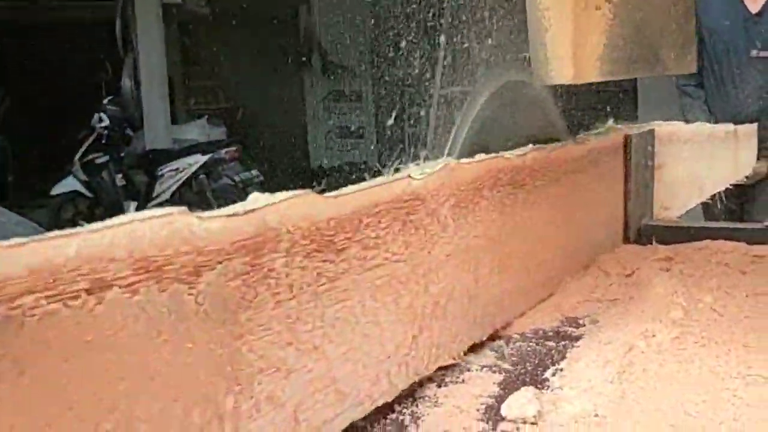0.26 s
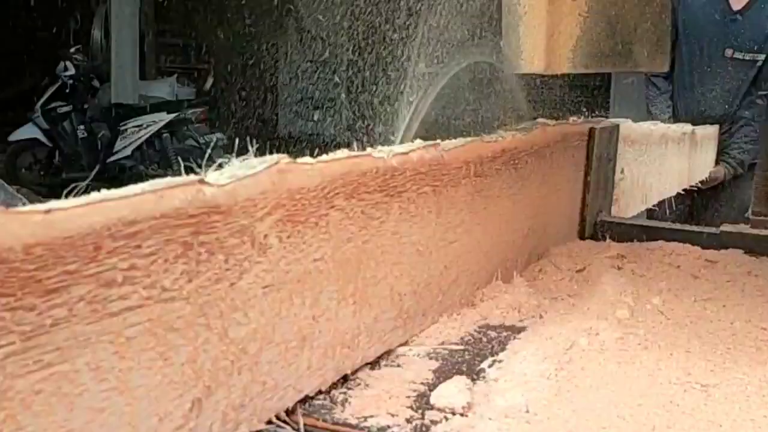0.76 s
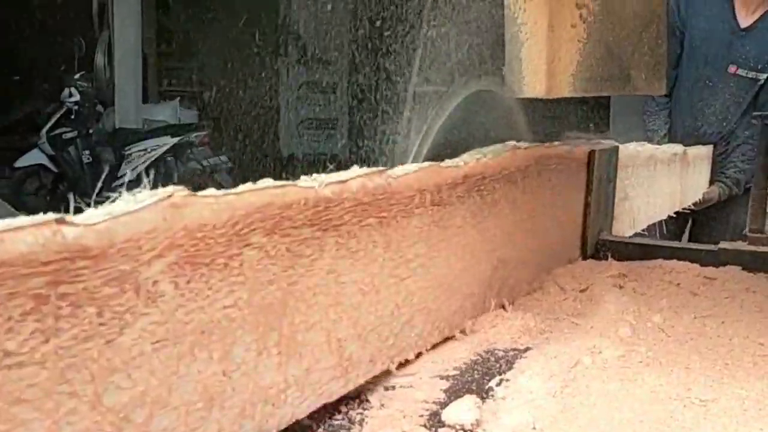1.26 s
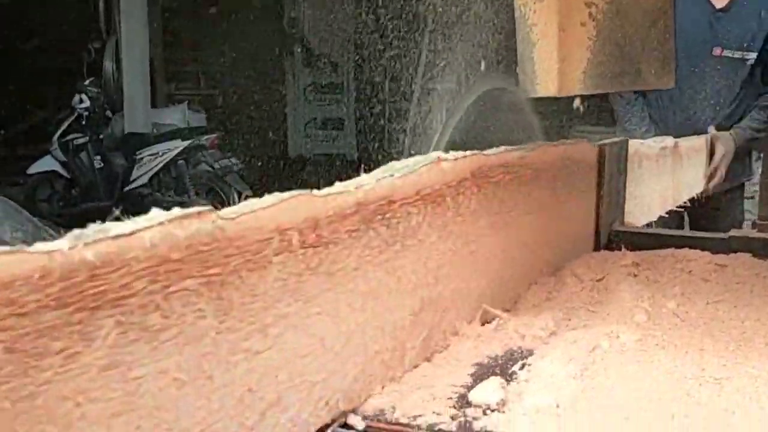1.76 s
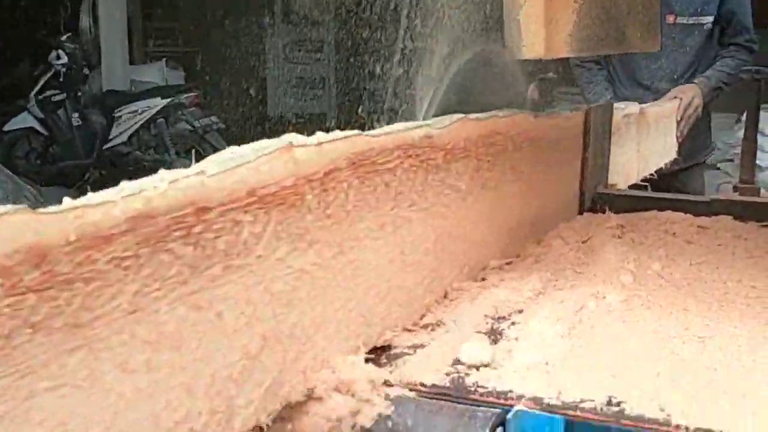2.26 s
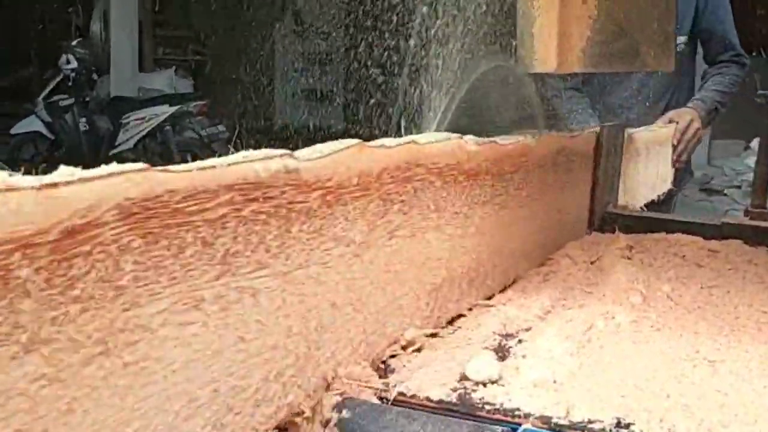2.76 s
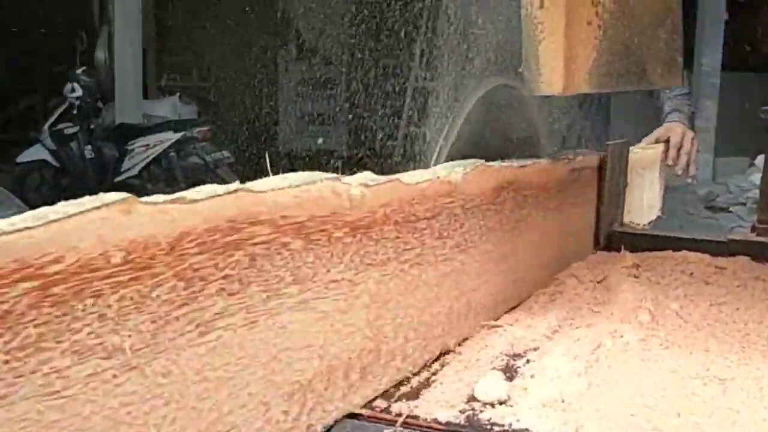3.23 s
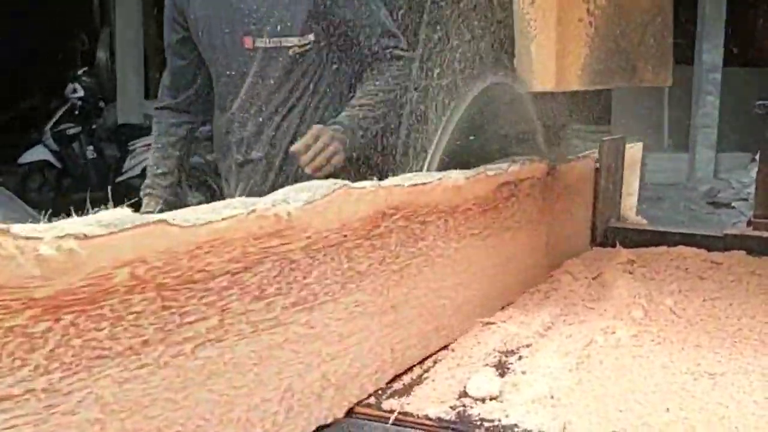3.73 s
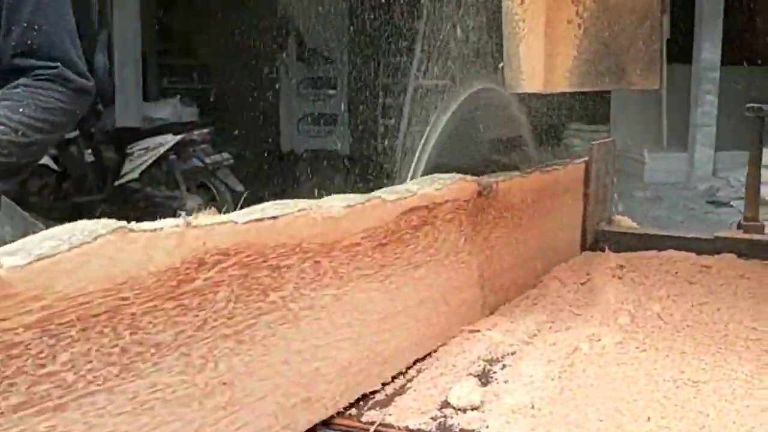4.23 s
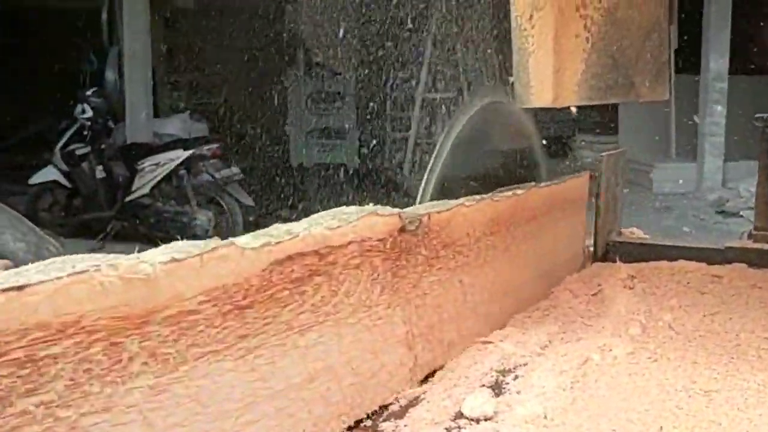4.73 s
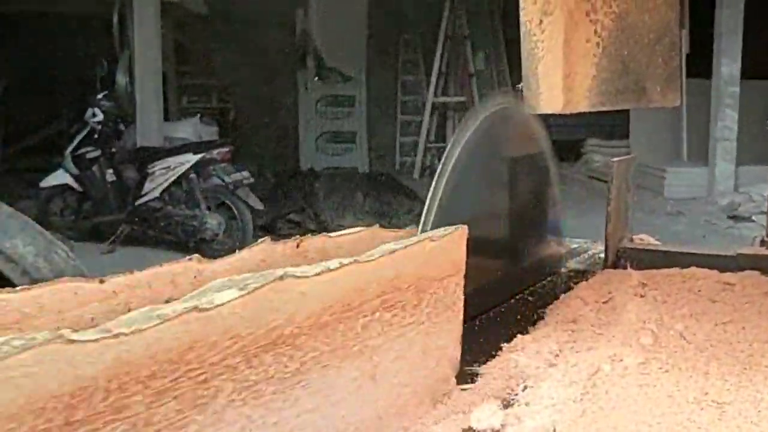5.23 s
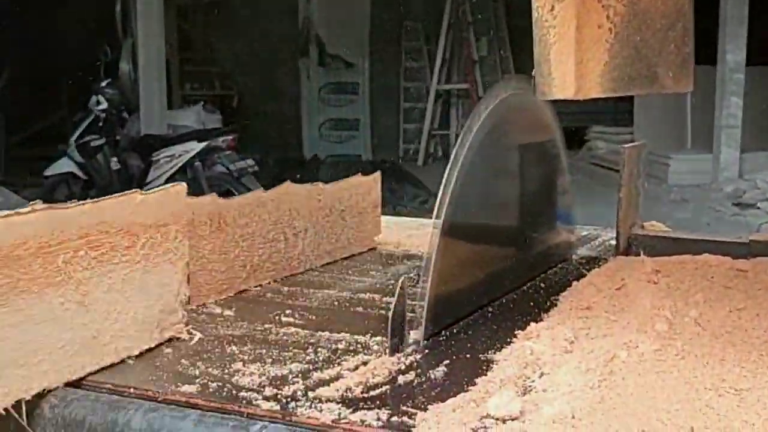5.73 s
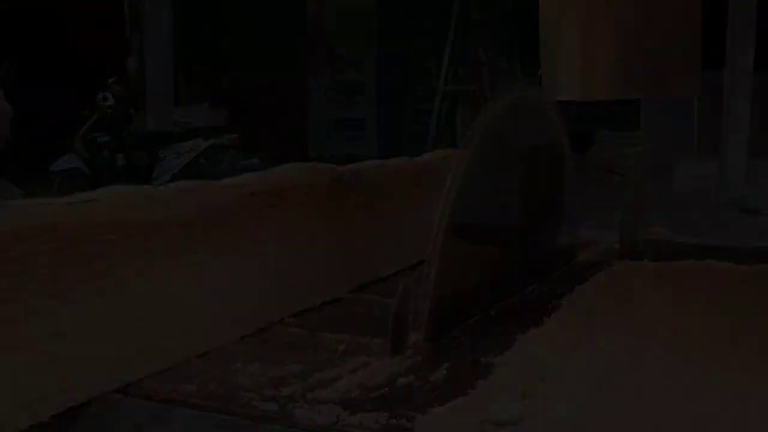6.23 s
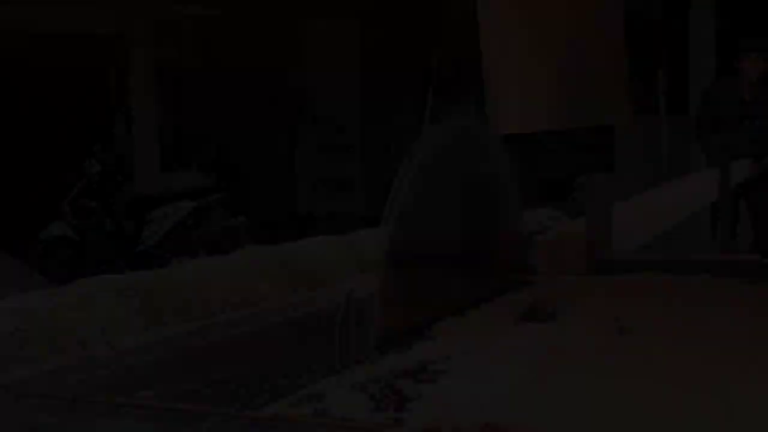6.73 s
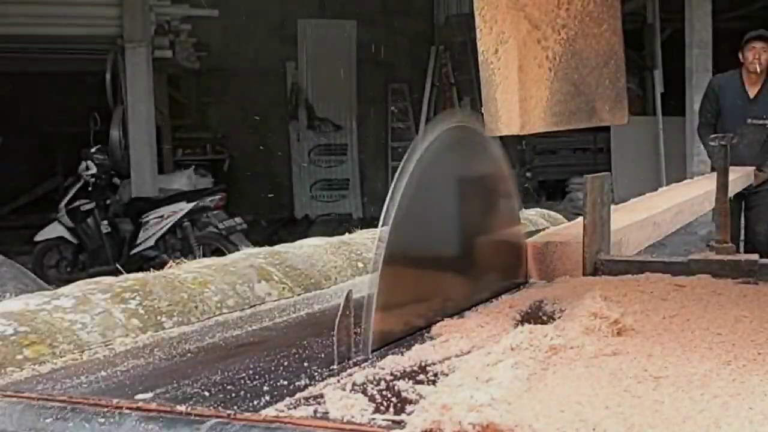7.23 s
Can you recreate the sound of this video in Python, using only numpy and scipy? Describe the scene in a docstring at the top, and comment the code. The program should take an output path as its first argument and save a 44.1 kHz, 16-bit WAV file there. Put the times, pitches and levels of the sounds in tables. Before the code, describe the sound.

From 0 to about 4.5 seconds, a large circular saw rips a log very close by in an open-air mill. A dense, bright, gritty rasp wavers slightly with the grain, with hissing chip spray, short fluttering blade pings and singing overtones. Underneath, a one-cylinder diesel pulses about twenty-one times a second, knocking under load while the rig judders dully. Around 4.5 the teeth break out: the rasp collapses amid hard knocks, and exhaust thumps bark out over rattling belts and metal, picking up slightly in speed. From 4.9 to 6.5, the plank brushes the free blade in soft, shimmering metallic swells. The sound slides down from about 5.8 to a snap of silence near 6.7, then rises again until the end at 7.5, with engine chug, clatter and a blade ring now leaning left, a light rasp growing as the next log nears the teeth.

```python
"""Open-air sawmill

A big circular saw, driven by a one-cylinder diesel, rips a log. Bursts of filtered noise make the rasp of the
teeth and the chip spray; narrow tones make the blade sing, and under load the exhaust comes in dull thuds. The
cut ends, the engine thumps on in filtered puffs and ringing knocks, and the blade rings as the plank slides
past it. The sound fades out, and fades in again as the next log nears the teeth."""
import sys
import numpy as np
from scipy import signal
from scipy.fft import rfft, irfft
from scipy.io import wavfile
from scipy.ndimage import uniform_filter1d

SR = 44100
rng = np.random.default_rng(int(sys.argv[2]) if len(sys.argv) > 2 else 0)


def dump(signal):
    """Clip the signal to [-1, 1] and save it as 16-bit WAV at the path in sys.argv[1]."""
    limited = np.clip(np.atleast_2d(signal).T, -1, 1)
    pcm = np.round(limited * 32767).astype(np.int16)
    wavfile.write(sys.argv[1], SR, pcm)


N = 329868
TIME = np.arange(N) / SR

# The engine labours in the cut and picks up when the blade comes free.
# Each row: time in seconds, engine firings per second.
ENGINE_SPEED = [(0, 20.99), (.4, 20.38), (.8, 21.13), (1.2, 20.59), (3.6, 20.46), (3.8, 20.98),
                (4.4, 21.27), (4.8, 22.17), (5, 21.4), (5.4, 21.94), (5.8, 21.44), (6.2, 21.97),
                (7.48, 21.92)]
# The log runs out, and later the next one meets the teeth.
# Each row: time in seconds, bite of the teeth in the wood from 0 to 1.
BITE = [(0, 0.98), (4.48, 0.85), (4.555, 0.16), (4.72, 0.05), (6.7, 0.15), (7.2, 0.1), (7.48, 0.4)]
# The grain along the log. Each row: time in seconds, rasp level at full bite in dB, rasp centre in Hz.
GRAIN = [(0, -25.3, 4620), (.3, -23.5, 4340), (.55, -24, 4200), (.85, -24, 4090), (1, -23.5, 4120),
         (1.5, -23.5, 4300), (2.1, -24.5, 4550), (2.7, -24, 4650), (3.7, -23.5, 4490), (4, -24.5, 4380),
         (4.3, -23.2, 4520), (4.48, -22, 4370)]

# Broad tone of each layer. Each row: frequency in Hz, relative density in dB per Hz.
RASP_TONE = [(300, -34), (480, -21.5), (620, -9), (1280, -4), (1550, -11.5), (2200, -11), (3100, -10),
             (3850, 0.7), (4350, 0.6), (4950, 2.7), (5650, -6), (6300, -12.5), (7500, -17), (10000, -27.5),
             (16000, -51.5)]
SPRAY_TONE = [(3000, -19.5), (6000, 6), (8500, -1), (10300, 2), (12500, 0), (15000, -8)]
EXHAUST_TONE = [(15, -11), (40, -3), (100, -2), (180, -1), (310, 0), (370, -5.5), (480, -8.5), (570, -9),
                (680, -20.5), (1100, -55), (4000, -74)]
LOADED_PUFF_TONE = [(15, -18.5), (40, -3), (80, 3), (180, 0.5), (290, -1.5), (350, -9), (450, -23.5),
                    (700, -17.5), (2000, -78)]
CLATTER_TONE = [(100, -3), (400, -5), (780, -4.5), (1020, 1.5), (1500, -0.5), (2200, 0), (2750, -3.5),
                (3200, -3), (4400, -12), (5200, -8), (5600, -13.5), (7500, -31), (10500, -27.5),
                (15000, -44)]
KNOCK_TONE = [(200, -21.5), (500, -28.5), (640, -11.5), (740, -17), (860, -2.5), (1000, -0.5), (1280, -1),
              (1500, -27.5), (2000, -6), (3000, -26), (8000, -47)]
RING_TONE = [(2500, -14.5), (3200, -6), (3600, 3.5), (4050, 2), (4450, 1.5), (4800, -3.5), (5100, -24),
             (5550, -16), (6500, -18.5), (10000, -50)]
RUMBLE_TONE = [(15, -1.5), (30, -7.5), (60, 2), (110, 0.5), (180, 1), (260, -6), (380, -13), (560, -19.5),
               (750, -36), (2000, -73.5)]

# Modes of the engine casting, then of a loose sheet-metal cover.
# Each row: frequency in Hz, 60 dB decay time in seconds, relative level in dB.
CRANKCASE_MODES = [(650, 0.043, -8), (797, 0.07, -1.5), (938, 0.051, 1.5), (1169, 0.058, -5.5),
                   (1307, 0.067, -7)]
COVER_MODES = [(977, 0.069, -1.5), (1061, 0.072, -3), (1790, 0.08, -5), (2273, .08, -9)]

# Resonances of the hum under the loaded thuds, the guard, the exhaust pipe, and the blade in the wood and free.
# # Each row: frequency in Hz, width in Hz, lift in dB.
LOADED_HUM = [(53.3, 9.9, 6), (169, 59, 2), (252.7, 18.5, 6.5), (312, 7.8, 4.5)]
GUARD = [(2260, 20, 2), (2734, 74, 3.7), (5450, 200, 3)]
PIPE = [(113, 19, 5), (163.6, 28, 7), (210.4, 15, 4), (273, 21, 5.5), (319.7, 15.5, 4.5), (503, 12, 2.5),
        (581, 24, 9)]
BLADE_IN_WOOD = [(1917, 140, 11.5), (2690, 150, 4.7), (3110, 930, 9.9), (5550, 240, 4.8)]
BLADE_FREE = [(3750, 60, 3.3), (4053, 70, 5.6), (4640, 120, 2.4)]

# The hardest single knocks. Each row: time in seconds, dB above an ordinary knock.
HARD_KNOCKS = [(.038, 3), (.241, 1), (.283, 3), (.388, 3.5), (1.055, 4.5), (1.983, 2.5), (2.174, 5.5),
               (2.813, 2.5), (3.2, 3), (3.349, 3), (3.83, 5.5), (4.072, 4), (4.31, 3.5), (4.351, 4),
               (4.397, 5.5), (4.448, 5), (4.548, 8), (4.641, 8.5), (4.685, 7), (4.96, 1.5), (5.05, 4),
               (5.097, 4), (5.282, 4.5), (5.781, 5), (5.831, 3)]
# The hardest exhaust thumps once the blade is free. Each row: time in seconds, dB above an ordinary puff.
HARD_THUMPS = [(4.753, 1), (4.798, 2), (4.84, 1.5), (4.894, 2.5), (4.94, 3.5), (4.991, 3), (5.035, 2.5),
               (5.122, 4), (5.173, 2.5), (5.211, 3.5), (5.311, 2), (5.486, 2.5), (5.539, 3), (5.584, 2.5),
               (5.626, 3), (5.769, 1.5), (5.863, 2), (5.955, 1), (6, 2)]
# The blade's clearest pings, in the cut and as it breaks out.
# Each row: time in seconds, mean pitch in Hz, peak in dB ahead of the stereo stage.
CHIRPS = [(.252, 2640, -28), (.696, 2540, -30), (1.258, 2550, -30), (1.462, 2560, -34), (1.703, 2570, -31),
          (1.804, 2630, -31), (1.849, 2600, -28.5), (2.196, 2580, -28), (2.296, 2566, -34),
          (2.528, 2560, -29), (2.634, 2570, -28), (3.412, 2560, -27.5), (3.508, 2570, -28.5),
          (3.603, 2540, -31), (4.413, 2610, -31), (4.46, 2680, -29), (4.555, 2560, -33), (4.61, 2460, -32),
          (4.652, 2495, -31), (4.745, 2300, -30)]
# The plank brushes the free blade. Each row: closest touch in seconds, length in seconds, ring in dB.
BRUSHES = [(4.92, 0.46, -35), (5.273, 0.27, -27.5), (5.643, 0.26, -26), (5.88, 0.15, -27),
           (6.148, 0.27, -26.5), (6.515, 0.44, -24.5), (7.35, 0.66, -28.5)]
# The kerf pinches the blade and an overtone of the teeth's buzz sings out; the last two rows are # a brief
# bright rasp of steel as the log ends. # Each row: tightest pinch in seconds, length in seconds, pitch in Hz,
# level at full bite in dB.
PINCHES = [(2.15, 0.66, 1900, -33.5), (2.4, 0.74, 2580, -34.5), (2.406, 0.081, 1280, -29.5),
           (2.94, 1, 1280, -37.5), (2.94, 1, 610, -39.5), (4.44, .06, 2750, -31), (4.46, 0.036, 2300, -27)]

# Stereo likeness of the two microphone ports. Each row: frequency in Hz, likeness from 0 to 1.
PORT_LIKENESS = [(60, .99), (330, .98), (620, .78), (900, .76), (1350, .2), (1650, .33), (2500, .34),
                 (3300, .18), (4000, .45), (4800, .24), (5900, .3), (7000, .15), (15000, .14)]
# Stereo balance. Each row: frequency in Hz, left minus right in dB.
PORT_LEAN = [(60, 1), (180, -0.5), (320, 2.5), (600, -0.5), (880, -0.5), (1100, -2), (2000, -2.5),
             (2800, -4.5), (3800, -4), (4300, -4.5), (5100, -6), (5700, 0.8), (6500, 4.5), (7800, -0.5)]
# Stereo phase. Each row: frequency in Hz, radians by which left leads.
PORT_LEAD = [(20, 0), (500, -.35), (1000, -.6), (1550, -3.1), (2050, -2.6), (2600, 0), (3200, 2.9),
             (3600, 3.7), (4000, 5.3), (4550, 6.4), (5150, 9.6), (5500, 11.1), (6900, 14.7), (15000, 36)]

# a firm resonance rides on the centre of the rasp
RIDGE_DB, RIDGE_WIDTH_HZ = 4.5, 280
# at full bite: chip spray, and the blade's chirp relative to the rasp
SPRAY_DB, ZING_DB = -37.5, -13
PINCH_WIDTH_HZ = 124
# at full bite, the dull exhaust thuds grow louder as the log advances
LOADED_PUFF_DB, LOADED_PUFF_DB_PER_S = -31.5, 0.74
# the log is pushed by hand, so the level of the teeth wavers (rms dB)
FEED_WAVER_DB, FEED_WAVER_HZ = 0.16, 3.9

# each layer: its level running free, and what full load adds
EXHAUST_DB, EXHAUST_LOAD_DB = -24, -16
KNOCK_DB, KNOCK_LOAD_DB = -40, 2
CRANKCASE_DB, CRANKCASE_LOAD_DB = -47.5, 13.3
CLATTER_DB, CLATTER_LOAD_DB = -28.5, -4
RING_DB, RING_LOAD_DB = -34.5, 3.5
COVER_DB, COVER_LOAD_DB = -39, -7.5
KNOCK_DELAY_S, FLYWHEEL_LAG_S = 0.013, 0.15

# the blade breaks out: the slack drive rattles and the exhaust barks until the governor settles
BREAKOUT_S = 4.52
RATTLE_DB, RATTLE_S = 2.5, 1.5
BARK_DB, BARK_S = 3.5, 0.43
# second puff of each firing against an ordinary first: when settled, and what the bark adds
SECOND_PUFF_DB, SECOND_PUFF_BARK_DB = -3.5, 7

# the fader slides down, snaps shut for a moment, and slides up again
SILENT_FROM_S, SILENT_TO_S = 6.692, 6.742
FADE_OUT_S, FADE_OUT_POWER = 0.96, 1.35
FADE_IN_S, FADE_IN_POWER = 0.95, 1.33
# the next log is heard from a new spot: the saw's shift to the left
NEXT_LOG_PAN_DB = 8.5
EDGE_HZ = 15200


def amp(db):
    """Decibels to gain."""
    return 10 ** (np.asarray(db) / 20)


def unit(x):
    """Scaled to an rms of 1."""
    return x / np.sqrt(np.mean(x ** 2) + 1e-20)


def curve(rows):
    """The columns of a table, joined by straight lines in time."""
    s, *columns = np.transpose(rows)
    return [np.interp(TIME, s, c) for c in columns]


def read(points, hz):
    """A frequency table, joined by straight lines in log frequency."""
    f, value = np.transpose(points)
    return np.interp(np.log(hz + 1), np.log(f + 1), value)


def hiss():
    """Two unrelated white noises."""
    return rng.standard_normal((2, N))


def drift(rate_hz):
    """Smooth chance of rms 1, which falls away above the rate."""
    hz = np.fft.rfftfreq(N, 1 / SR)
    lowpass = 1 / (1 + (hz / rate_hz) ** 4)
    return unit(irfft(rfft(rng.standard_normal(N)) * lowpass, N))


def colour(x, spectrum, resonances=(), size=4096):
    """A causal filter: a broad spectrum with resonances standing on it."""
    hz = np.fft.rfftfreq(size, 1 / SR)
    db = read(spectrum, hz)
    for f, width, lift in resonances:
        db = db + lift / (1 + (2 * (hz - f) / width) ** 2)
    # minimum phase: the phase follows from the log gain
    log_gain = np.log(amp(np.r_[db, db[-2:0:-1]]))
    taps = np.fft.ifft(np.exp(np.conj(signal.hilbert(log_gain)))).real
    return unit(signal.oaconvolve(x, taps[None], axes=1)[:, :N])


def peak_noise(hz, width_hz):
    """Noise through one narrow resonance."""
    return signal.lfilter(*signal.iirpeak(hz, hz / width_hz, fs=SR), hiss())


def level_out(x):
    """Keeps the tone of a ringing noise and evens out its strength."""
    tone = signal.hilbert(x)
    return unit(tone.real / (np.abs(tone) + np.std(x) / 5))


def swing(x, angle):
    """A push of air becomes a back-and-forth stroke: every frequency is turned by one angle."""
    return (signal.hilbert(x) * np.exp(1j * angle)).real


def patches(shape, bins, frames):
    """Random patches of rms 1, smoothed over frequency bins and time frames."""
    over_hz = uniform_filter1d(rng.standard_normal(shape), size=bins, axis=0)
    return unit(uniform_filter1d(over_hz, size=frames, axis=1))


def shimmer(x, depth_db=2.5, frame_size=2048, hold_size=5):
    """Neighbouring bands swell and sink, each in its own time."""
    overlap = frame_size * 3 // 4
    z = signal.stft(x, SR, nperseg=frame_size, noverlap=overlap)[2]
    z = z * amp(depth_db * patches(z.shape[1:], 3, hold_size))
    return unit(signal.istft(z, SR, nperseg=frame_size, noverlap=overlap)[1][:, :N])


def beats(turns, jitter_s):
    """The moments at which a count of turns passes a whole number, slightly uneven."""
    times = TIME[1:][np.diff(np.floor(turns)) > 0]
    return times + jitter_s * rng.standard_normal(len(times))


def clicks(times, spread_db):
    """One impulse at each time, of uneven size."""
    out = np.zeros(N)
    size = amp(spread_db * np.clip(rng.standard_normal(N), -2, 2))
    at = np.round(times[(times >= 0) & (times < TIME[-1])] * SR).astype(int)
    out[at] = size[at]
    return out


def accented(times, spread_db, rows):
    """Uneven impulses, with listed hard blows in place of any that fall within 22 ms of them."""
    s, db = np.transpose(rows)
    gap = np.abs(times[:, None] - s).min(axis=1)
    out = clicks(times[gap > .022], spread_db)
    out[np.round(s * SR).astype(int)] = amp(db)
    return out


def swells(x, rise_s, decay_s):
    """Each impulse becomes an envelope that rises and dies away."""
    t = TIME[:SR // 10]
    shape = (1 - np.exp(-t / rise_s)) * np.exp(-t / decay_s)
    return unit(np.abs(signal.oaconvolve(x, shape)[:N]))


def touch(s, length):
    """A smooth swell that comes and goes around one moment."""
    return np.exp(-2 * ((TIME - s) / length) ** 2)


def after_breakout(settle_s, rise_s=0.045):
    """Climbs quickly to 1 as the blade leaves the wood, then settles back towards 0."""
    since = TIME - BREAKOUT_S
    return np.clip(1 + since / rise_s, 0, 1) * np.exp(-np.maximum(since, 0) / settle_s)


def ports(pair):
    """Two unrelated signals become what the two ports hear: alike in the bass, apart in the treble."""
    hz = np.fft.rfftfreq(N, 1 / SR)
    a, b = rfft(pair)
    same = np.clip(read(PORT_LIKENESS, hz), 0, 1)
    lean = amp(read(PORT_LEAN, hz) / 2)
    right = (same * a + np.sqrt(1 - same ** 2) * b) * np.exp(-1j * read(PORT_LEAD, hz))
    return irfft(np.array([a * lean, right / lean]), N)


def rumble(resonances):
    """The low drone of a hollow body that fills the gaps between strokes."""
    return colour(hiss(), RUMBLE_TONE, resonances)


def clatter(firings, ticks_per_s=160, steady=3.1, throb=0.29):
    """Belt, bearings and valve gear: loose ticks over a whirr that throbs with the engine."""
    tick_times = TIME[rng.random(N) < ticks_per_s / SR]
    ticks = swells(clicks(tick_times, spread_db=1.5), rise_s=.00015, decay_s=.002)
    beat = swells(clicks(firings + .016, spread_db=3), rise_s=.001, decay_s=.012)
    return shimmer(colour(hiss() * (steady + ticks + throb * beat), CLATTER_TONE, GUARD), depth_db=2)


def clank():
    """The tone of a blow on the casting, held at an even strength."""
    return level_out(colour(hiss(), KNOCK_TONE))


def knock(blows, rattle=0.092):
    """A hard clack once in every engine cycle, over a faint rattle."""
    return unit(clank() * (swells(blows, rise_s=.003, decay_s=.0075) + rattle))


def struck(blows, modes, rise_s, spread_db=1.05, detune_hz=13):
    """Each blow sets a metal part's modes ringing, never twice with quite the same pitch or balance."""
    t = TIME[:SR // 10]
    out = np.zeros((2, N + len(t)))
    for i in np.flatnonzero(blows):
        for hz, t60, db in modes:
            size_db, detune, side = rng.standard_normal(3)
            ringing = (1 - np.exp(-t / rise_s)) * amp(db + spread_db * size_db - 60 * t / t60)
            angle = 2 * np.pi * (hz + detune_hz * detune) * t
            pair = np.array([np.sin(angle), np.sign(side) * np.cos(angle)])
            out[:, i:i + len(t)] += blows[i] * ringing * pair
    return unit(out[:, :N])


def exhaust(firings, second_db, lead_s=.002, drone=0.64):
    """One sharp puff a firing and a duller, fickle second one close behind it keep the pipe droning."""
    jitter = .0022 * rng.standard_normal((2, len(firings)))
    early, late = firings - lead_s + [[0], [.017]] + jitter
    second = uniform_filter1d(clicks(late, spread_db=1.5), size=46)  # smeared over 1 ms
    puffs = accented(early, 1.2, HARD_THUMPS) + amp(second_db) * second
    strokes = swing(colour(-puffs[None], EXHAUST_TONE, PIPE), np.pi / 4)
    return unit(strokes + drone * level_out(rumble(PIPE)))


def engine(firings, bite):
    """Under load the diesel knocks harder and its exhaust and cover are subdued, a little late by flywheel."""
    strain = (bite + np.interp(TIME - FLYWHEEL_LAG_S, TIME, bite)) / 2
    bark = after_breakout(BARK_S)
    blows = accented(firings + KNOCK_DELAY_S, .8, HARD_KNOCKS)

    clatter_db = CLATTER_DB + CLATTER_LOAD_DB * bite + RATTLE_DB * after_breakout(RATTLE_S)
    whirr = amp(clatter_db) * clatter(firings)
    cover = amp(COVER_DB + COVER_LOAD_DB * strain) * struck(blows, COVER_MODES, rise_s=0.0041)
    casting = amp(CRANKCASE_DB + CRANKCASE_LOAD_DB * strain) * struck(blows, CRANKCASE_MODES, rise_s=0.004)
    clack = amp(KNOCK_DB + KNOCK_LOAD_DB * strain) * knock(blows)
    exhaust_db = EXHAUST_DB + EXHAUST_LOAD_DB * strain + BARK_DB * bark
    puffs = amp(exhaust_db) * exhaust(firings, SECOND_PUFF_DB + SECOND_PUFF_BARK_DB * bark)
    return whirr + cover + casting + clack + puffs


def brushing(base_db):
    """Strength of the blade's ring: a base level, and a swell for each touch of the plank."""
    power = amp(base_db) ** 2
    for s, length, db in BRUSHES:
        power = power + (amp(db) * touch(s, length)) ** 2
    return np.sqrt(power)


def ring(shaft, wobble=0.09, flutter_db=1.5):
    """The plank brushes the side of the free blade, whose crowded modes sing unevenly."""
    rub = (1 + wobble * np.cos(2 * np.pi * shaft)) * amp(flutter_db * drift(52))
    return shimmer(colour(hiss() * rub, RING_TONE, BLADE_FREE), depth_db=2.4)


def chirps(length_s=0.021, wander_hz=75):
    """The blade snags in the kerf and gives a short, fluttering metallic ping."""
    pitch_hz = curve(CHIRPS)[0] + wander_hz * drift(160)
    strength = sum(amp(db) * touch(s, length_s) for s, hz, db in CHIRPS)
    tone = strength * np.exp(2j * np.pi * np.cumsum(pitch_hz) / SR)
    return np.array([tone.real, tone.imag])


def loaded_puffs(firings, first_s=.003, second_s=.024, slop_s=.0038):
    """Under load the exhaust comes as two dull, uneven thuds an engine cycle, with a hum between them."""
    slop = slop_s * rng.standard_normal((2, len(firings)))
    first = clicks(firings + first_s + slop[0], spread_db=1)
    second = clicks(firings + second_s + slop[1], spread_db=1)
    strokes = swing(colour(-(first + second)[None], LOADED_PUFF_TONE, LOADED_HUM), np.pi / 2)
    return unit(strokes + .4 * rumble(LOADED_HUM))


def spray(chips_per_s=2400, dust=0.59, flutter_db=0.4):
    """Chips tick against the guard in a hiss of sawdust."""
    chips = (rng.random(N) < chips_per_s / SR) * amp(2.1 * np.minimum(rng.exponential(1, N), 4))
    return colour(hiss() * (chips + dust) * amp(flutter_db * drift(60)), SPRAY_TONE)


def pinches(firings):
    """Where the wood closes on the blade, a narrow tone swells, surging with the engine."""
    surge = unit(1.6 + swells(clicks(firings + .018, spread_db=3), rise_s=.003, decay_s=.014))
    singing = np.zeros((2, N))
    for s, length, hz, db in PINCHES:
        singing += amp(db) * touch(s, length) * level_out(peak_noise(hz, PINCH_WIDTH_HZ))
    return surge * singing


def zing(firings, hz=2580, width_hz=120, delay_s=.018, decay_s=0.022):
    """Each surge of the drive makes one mode of the loaded blade chirp."""
    surge = swells(clicks(firings + delay_s, spread_db=1.5), rise_s=.003, decay_s=decay_s)
    return unit(level_out(peak_noise(hz, width_hz)) * surge)


def rasp(shaft, centre_hz, tooth_hz=645, grit_db=1.5, scrape=0.64, wobble=0.053, flutter_db=0.5, sway=0.75):
    """Teeth tear the fibres in uneven bursts; the blade rings with them, its pitch shifting with the grain."""
    tooth_turns = np.cumsum(tooth_hz * (1 + .12 * drift(40))) / SR
    teeth = clicks(beats(tooth_turns, jitter_s=.0003), spread_db=grit_db)
    bursts = swells(teeth, rise_s=.00005, decay_s=0.00051)
    force = (scrape + bursts) * (1 + wobble * np.cos(2 * np.pi * shaft))
    tear = colour(hiss() * force * amp(flutter_db * drift(25)), RASP_TONE, BLADE_IN_WOOD)

    # slide the spectrum with the grain and set the ridge on its centre
    hz, t, z = signal.stft(tear, SR, nperseg=512)
    hz = hz[:, None]
    centre = np.interp(t, TIME, centre_hz)
    ridge_db = RIDGE_DB / (1 + (2 * (hz - centre) / RIDGE_WIDTH_HZ) ** 2)
    stretch = (centre / centre.mean()) ** sway
    moved_db = read(RASP_TONE, hz / stretch) - read(RASP_TONE, hz) + ridge_db
    z = z * amp(moved_db + 0.82 * patches(z.shape[1:], 5, 12))
    return unit(signal.istft(z, SR, nperseg=512)[1][:, :N])


def cutting(shaft, firings):
    """The cut at full bite: rasp, singing steel, chips and the dull thuds of the loaded exhaust."""
    rasp_db, centre_hz = curve(GRAIN)
    dull_puffs = amp(LOADED_PUFF_DB + LOADED_PUFF_DB_PER_S * TIME) * loaded_puffs(firings)
    chips = amp(SPRAY_DB) * shimmer(spray(), depth_db=3)
    tearing = shimmer(rasp(shaft, centre_hz), depth_db=2.2)
    teeth = amp(rasp_db) * (tearing + amp(ZING_DB) * zing(firings)) + chips
    return amp(FEED_WAVER_DB * drift(FEED_WAVER_HZ)) * teeth + pinches(firings) + dull_puffs


def scene():
    """Engine, free blade and saw, balanced by how hard the teeth bite."""
    (speed,), (bite,) = curve(ENGINE_SPEED), curve(BITE)
    bite = np.clip(bite, 0, 1)
    shaft = .24 + np.cumsum(speed) / SR  # in turns, one to a firing
    firings = beats(shaft, jitter_s=.001)
    blade = brushing(RING_DB + RING_LOAD_DB * bite) * ring(shaft)
    saw = bite * cutting(shaft, firings) + chirps() + blade
    pan = amp(np.outer([.5, -.5], NEXT_LOG_PAN_DB * (TIME > SILENT_TO_S)))
    return ports(engine(firings, bite)) + pan * ports(saw)


def record(dry):
    """The microphone rounds off the hardest thumps; the fader closes and reopens; then the band limit."""
    rounded = dry / (1 + (dry / .55) ** 4) ** .25
    fade_out = np.clip((SILENT_TO_S - TIME) / FADE_OUT_S, 0, 1) ** FADE_OUT_POWER
    fade_out = fade_out * (TIME < SILENT_FROM_S)
    fade_in = np.clip((TIME - SILENT_TO_S) / FADE_IN_S, 0, 1) ** FADE_IN_POWER
    lowpass = signal.firwin(511, EDGE_HZ, window=("kaiser", 9), fs=SR)
    return signal.oaconvolve(rounded * (fade_out + fade_in), lowpass[None], "same")


dry = scene()
out = record(dry)
dump(out)
```